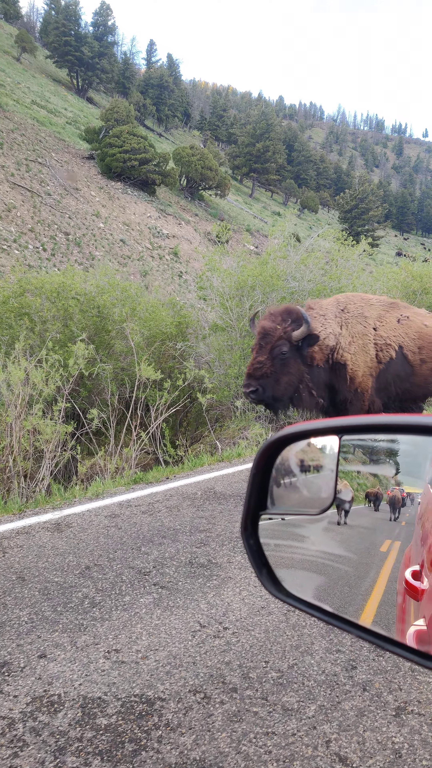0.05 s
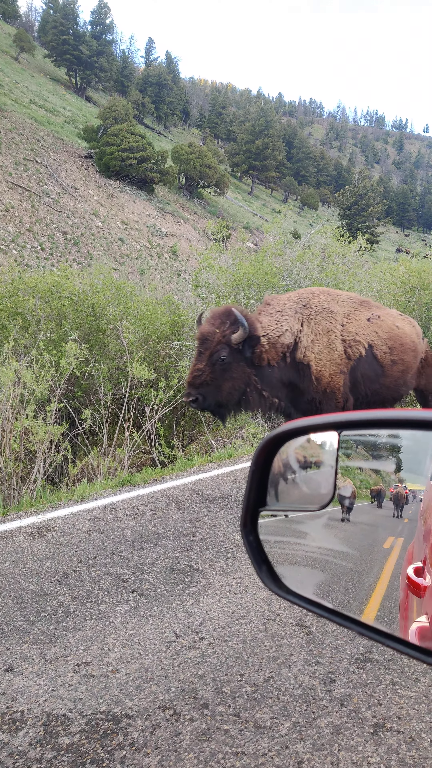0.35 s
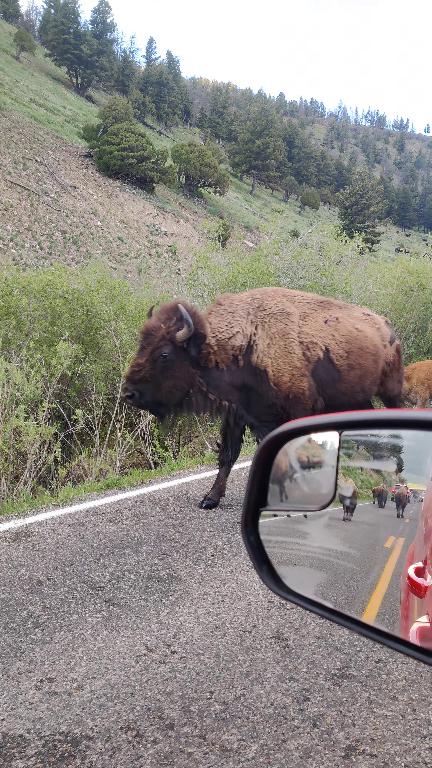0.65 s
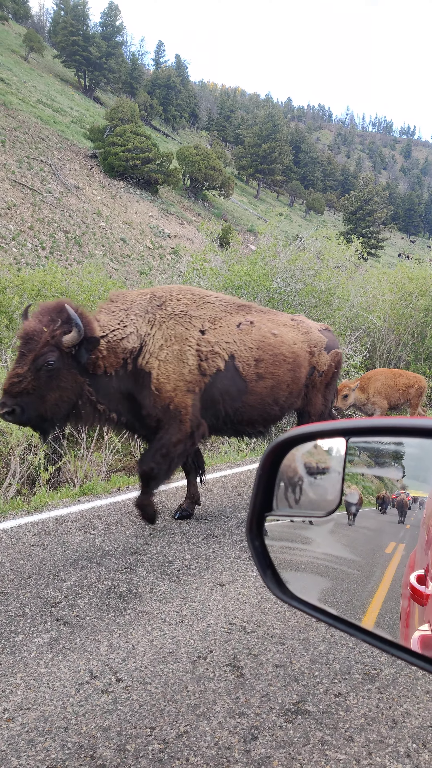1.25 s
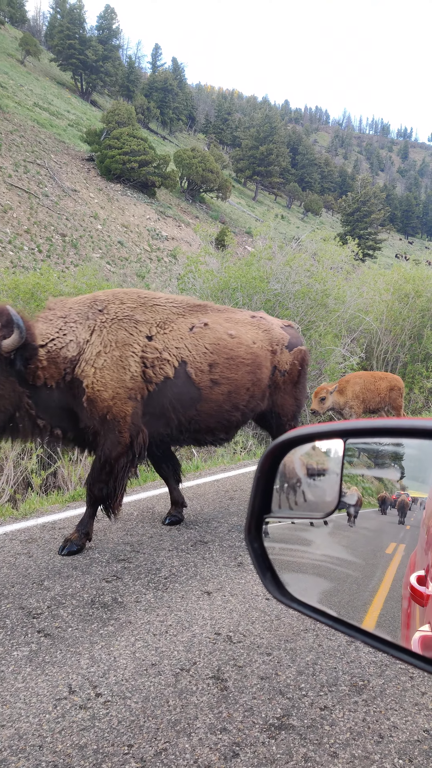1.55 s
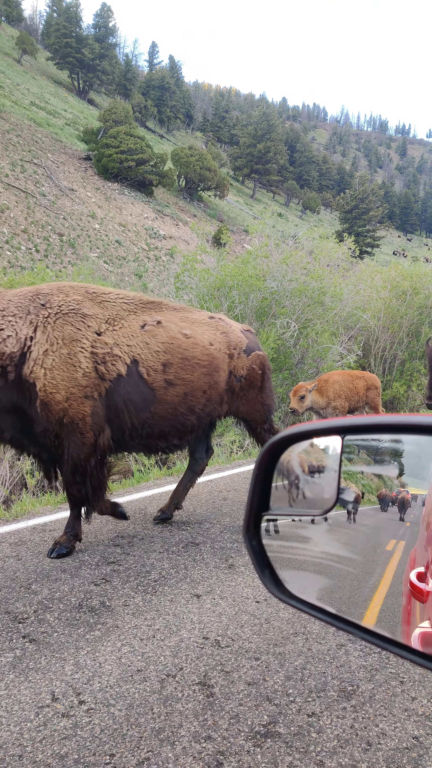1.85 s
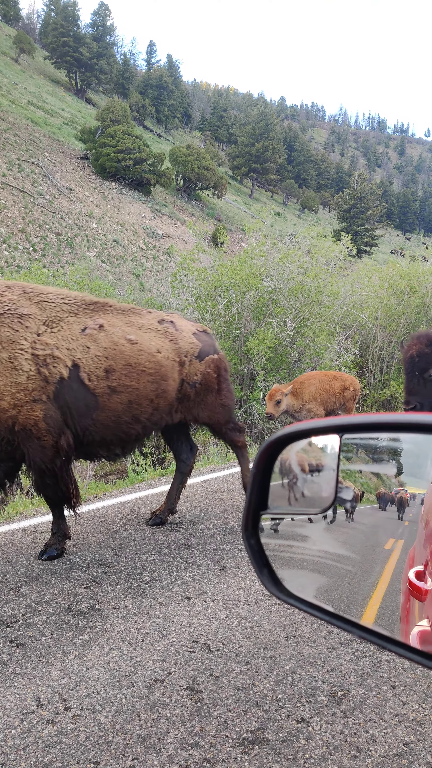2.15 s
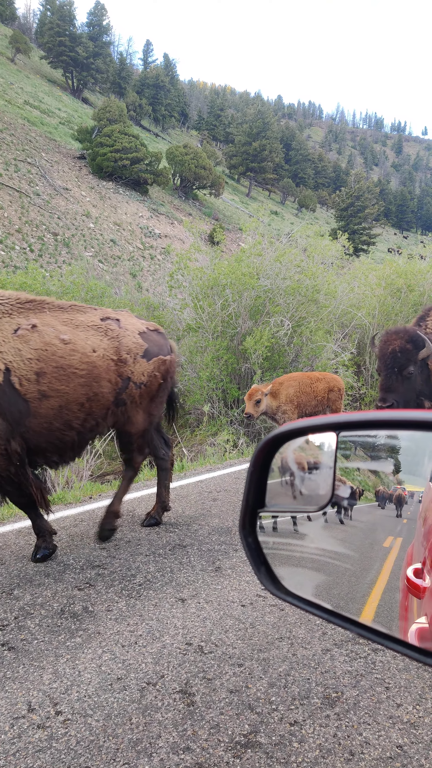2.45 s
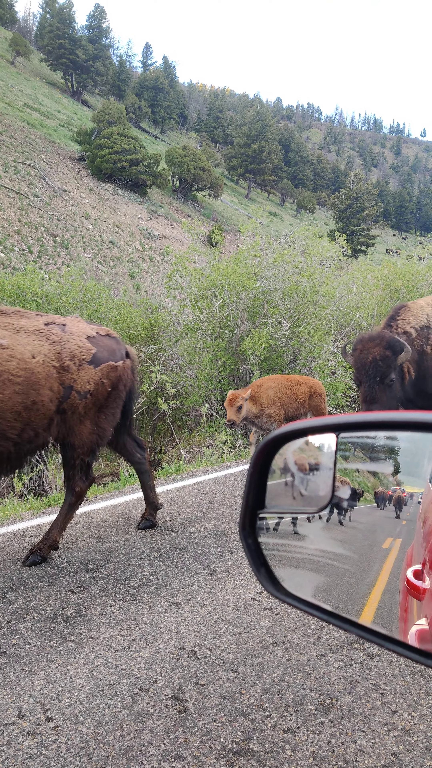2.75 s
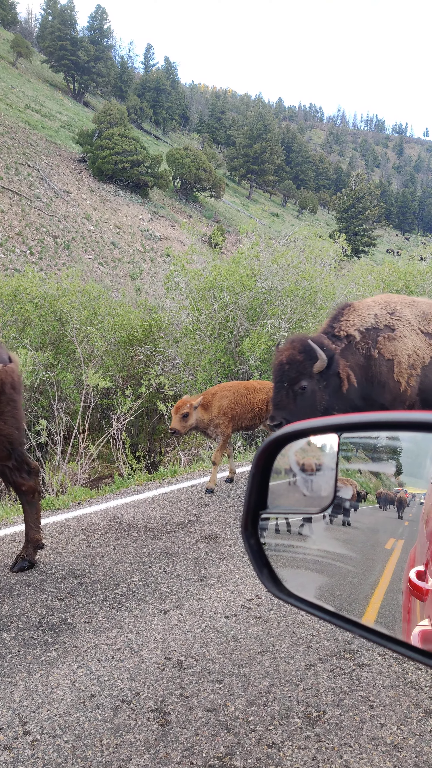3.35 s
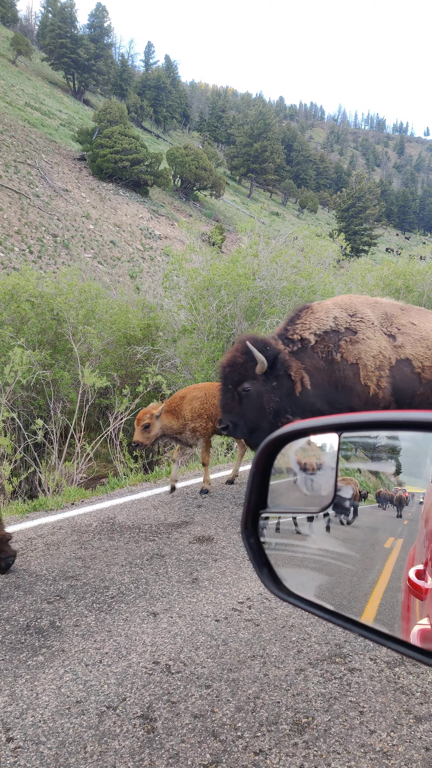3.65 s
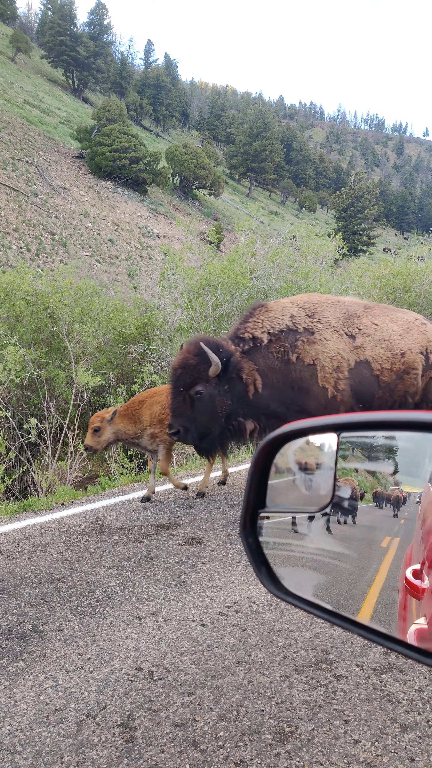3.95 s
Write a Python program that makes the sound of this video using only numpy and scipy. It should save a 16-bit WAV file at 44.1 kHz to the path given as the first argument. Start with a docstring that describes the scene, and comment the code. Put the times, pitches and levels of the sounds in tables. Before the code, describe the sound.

Bison grunt twice and step softly along a road while a car engine idles.

```python
"""Bison passing an idling car

A mountain road, stereo microphones at the car's open window, the herd on the left.
Two grunts, each a slow train of pulses ringing the throat: one open and raspy, one closed and deep.
Hooves clop and scuff grit on the asphalt over the engine's idle and a steady rush of air.
A few soft bumps land right on the right microphone."""
import sys
import numpy as np
from scipy import signal
from scipy.fft import rfft, irfft, next_fast_len
from scipy.io import wavfile
from scipy.ndimage import uniform_filter1d, minimum_filter1d, map_coordinates

SR = 44100
rng = np.random.default_rng(int(sys.argv[2]) if len(sys.argv) > 2 else 0)


def pcm_store(signal):
    """Save signal as 16-bit PCM."""
    levels = np.round(np.clip(np.atleast_2d(signal), -1, 1) * 32767)
    wavfile.write(sys.argv[1], SR, levels.astype(np.int16).T)


N = 176400

# colour of road grit, also of the hiss in a grunt: f/Hz, level/dB
GRIT_COLOUR = [(300, -5), (900, 12.5), (2000, 10), (3200, 4.5), (4900, 2.5), (5800, -8), (8000, -10),
               (11000, -21.5), (16000, -14)]


def open_grunt():
    """An open-mouthed grunt: seven sharp, raspy pulses that slow markedly."""
    # effort: t/s, level/dB, mouth opening (1 = open)
    effort = [(.867, -8.5, 1.07), (.91, 2.5, 0.97), (.957, 2.5, 0.99), (1.003, 0, 0.95), (1.05, -.5, 1),
              (1.10, -1, .99), (1.16, -6.5, 0.98)]
    # throat resonances: f/Hz, level/dB, t60/s
    throat = [(199, -39, 0.043), (395, -36.5, 0.027), (467, -35.5, 0.032), (580, -34.5, 0.051),
              (1510, -46.5, 0.055), (1588, -40.5, 0.077), (1885, -43, 0.055), (2310, -51, 0.07),
              (2600, -53, 0.046), (3020, -43, 0.055), (3470, -45.5, 0.05), (4480, -57, .03),
              (4950, -45, 0.022), (6650, -51, 0.02), (8250, -53, 0.018)]
    return grunt(effort, throat, start_s=.8672, pulses=7, gap_s=.0422, gap_growth_s=.00186,
                 closing_s=.00058, rasp=.35, rasp_s=.0015, hiss_db=-47.5)


def deep_grunt():
    """A closed, deep grunt: fifteen rounder pulses at an almost even pace."""
    # effort: t/s, level/dB, mouth opening (1 = open)
    effort = [(2.75, -8.5, 0.87), (2.785, -2, 0.87), (2.817, 0.5, 0.94), (2.852, -0.5, 0.95),
              (2.92, 3.5, 0.96), (3.02, 2.5, 1.023), (3.06, 1.5, 0.99), (3.092, 0, 1.05), (3.128, 0, 1),
              (3.162, -2.5, 0.6), (3.196, -0.5, 0.85), (3.233, -2.5, 0.96)]
    # throat resonances: f/Hz, level/dB, t60/s
    throat = [(153, -32, 0.068), (340, -28.5, 0.027), (395, -24.5, 0.038), (571, -27.5, 0.051),
              (1620, -55, .045), (1984, -49, 0.052)]
    return grunt(effort, throat, start_s=2.7505, pulses=15, gap_s=.0333, gap_growth_s=.00016,
                 closing_s=.0019, rasp=.12, rasp_s=.0036, hiss_db=-66.5)


def grunt(effort, throat, start_s, pulses, gap_s, gap_growth_s, closing_s, rasp, rasp_s, hiss_db):
    """Flaps of the vocal folds ring the throat; a closing mouth makes them lower, duller and rougher."""
    times, levels, openings = np.transpose(effort)
    out, t = np.zeros(N), np.arange(SR // 10) / SR
    for k in range(pulses):
        s = start_s + gap_s * k + gap_growth_s * k * k / 2
        gain, opening = amp(np.interp(s, times, levels)), np.interp(s, times, openings)
        shut = max(1 - opening, 0)
        shifts = opening + .008 * rng.standard_normal(len(throat))
        tract = np.zeros(len(t))
        for (hz, db, t60), shift in zip(throat, shifts):
            muffle_db = 14 * shut * np.log2(hz / throat[1][0])
            tract += amp(db - muffle_db - 60 * t / t60) * np.sin(2 * np.pi * hz * shift * t)
        tract *= 1 - np.exp(-(t / closing_s) ** 2)
        puff = rng.standard_normal(len(t)) * t * np.exp(-t / rasp_s)
        rough = signal.fftconvolve(puff, tract)[:len(t)]
        rough *= (rasp + 1.2 * shut) * np.linalg.norm(tract) / np.linalg.norm(rough)
        hiss = burst(GRIT_COLOUR, rise_s=.00089, decay_s=.003, tail_db=-20, tail_s=.016, spiky=.48)
        add(out, s - closing_s / 2, gain * (rough - tract))
        add(out, s, gain * amp(hiss_db) * hiss)
    return out


def clops(ring_octaves=.11):
    """Hooves strike asphalt: each a ringing knock of horn, a dull thud and a gritty crack."""
    # steps: t/s, level/dB, ring f/Hz, relative thud/dB, relative crack/dB, ring boost/dB
    steps = [(0.265, -48, 1460, -20, 11, -2), (0.7395, -33, 1450, -6, -10, 4), (1.114, -41, 1830, 1, 2, 12),
             (1.288, -42, 1490, -10, -20, 10), (1.5441, -32.5, 1640, -13, -9, 3),
             (1.868, -42, 1700, -4, -18, 0), (1.901, -39, 1490, -6, -11, -1),
             (2.0097, -34.5, 1640, -23, -30, 12), (2.320, -39.5, 1200, 3, -3, 0),
             (2.4661, -31, 1870, -14, -11, -2), (3.044, -36.5, 1800, -20, -15, -3),
             (3.089, -32.5, 1470, 1, -6.5, -10), (3.274, -37, 1080, 9.5, -22, 0),
             (3.362, -41.5, 1600, -13, -1.5, -7), (3.421, -39.5, 1600, -1, -1, -3.5),
             (3.727, -40, 1440, 2, -23, -1), (3.8445, -26, 1600, -2.5, -12, -1),
             (3.863, -34.5, 1100, 0, -12, 0)]
    # colour of horn: multiple of the ring frequency, level/dB
    horn_colour = [(.2, -16), (.5, -2), (.8, -3), (1, 4.5), (1.15, -2), (1.35, -21), (3, -21), (3.7, -57),
                   (9, -59)]
    # colour of the thud: f/Hz, level/dB
    thud_colour = [(100, 15), (300, 0), (650, 5), (1200, -11), (3000, -67)]
    out = np.zeros(N)
    for s, db, ring_hz, thud_db, crack_db, ring_db in steps:
        horn = [(ring_hz * k, level + ring_db * np.exp(-(np.log2(k) / ring_octaves) ** 2))
                for k, level in horn_colour]
        knock = burst(horn, rise_s=.00021, decay_s=.00095, tail_db=-14, tail_s=.01, spiky=.06)
        thud = burst(thud_colour, rise_s=.00029, decay_s=.0043, tail_db=-26, tail_s=.016, spiky=.12)
        crack = burst(GRIT_COLOUR, rise_s=.00051, decay_s=.00089, tail_db=-16, tail_s=.011, spiky=.13)
        add(out, s, amp(db) * (knock + amp(thud_db) * thud + amp(crack_db) * crack))
    return out


def scuffs():
    """Grit crunches under the hooves."""
    # crunches: t/s, level/dB, length/s, treble tilt/(dB per octave)
    crunches = [(.272, -42.5, 0.0076, 1.5), (.345, -49.5, .11, -1), (.47, -47, 0.026, 0),
                (0.759, -37, 0.011, 1.5), (0.772, -42.5, 0.032, 3), (1.079, -45, 0.0097, 4.5),
                (1.442, -51.5, 0.015, 8), (1.752, -49.5, 0.032, 6.5), (1.779, -46.5, 0.019, 3.5),
                (1.9327, -36.5, 0.011, 0.3), (2.182, -47.5, 0.0086, 6), (2.409, -43.5, 0.0063, 8),
                (2.447, -48.5, 0.038, 1), (2.822, -38, 0.0077, 2), (2.837, -43, 0.0078, 8.5),
                (2.854, -46, 0.013, 3), (2.900, -47, 0.0042, 8), (3.164, -51, 0.059, 6.5),
                (3.273, -37.5, 0.0091, 1.5), (3.496, -50, 0.033, 9.5)]
    out = np.zeros(N)
    for s, db, length, tilt in crunches:
        colour = [(hz, level + tilt * np.log2(hz)) for hz, level in GRIT_COLOUR]
        crunch = burst(colour, rise_s=.13 * length, decay_s=.41 * length,
                       tail_db=-36, tail_s=.026, spiky=.4)
        add(out, s - .099 * length, amp(db) * crunch)
    return out


def stones(level_db=-58, count=60):
    """Small stones tick at random as they shift under the rest of the herd."""
    out = np.zeros(N)
    for when, size in rng.random((count, 2)):
        tick = burst(GRIT_COLOUR, rise_s=.0011, decay_s=.0038, tail_db=-21, tail_s=.0067, spiky=.7)
        add(out, when * N / SR, amp(level_db + 10 * size ** 2) * tick)
    return out


def swell():
    """A soft, dull rush grows and fades around the last step."""
    # rise and fall: t/s, level/dB
    levels = [(3.68, -83), (3.77, -45), (3.84, -50), (3.88, -51.5), (3.98, -68)]
    # colour of the rush: f/Hz, level/dB
    colour = [(200, -25), (420, 5), (600, 1), (850, -11), (1300, -13), (4000, -52)]
    rush = filtered(rng.standard_normal(N), lambda hz: amp(along(colour, hz)))
    return amp(curves(levels)[0]) * rush / np.sqrt(np.mean(rush ** 2))


def engine(firing_hz=26, drift_rad=.2, right_lag_rad=1.0):
    """The idle under the microphones: a strong firing fundamental and slightly unsteady orders."""
    # firing fundamental: t/s, left level/dB, right level/dB
    boom_levels = [(0, -25, -30), (.5, -31, -25.5), (1.3, -25, -32), (1.9, -37.5, -26.5), (2.5, -31, -24.5),
                   (3.0, -31, -23.5), (3.5, -32.5, -21), (4, -23.5, -23.5)]
    # engine orders: multiple of the firing rate (rounded below to quarters), level/dB
    order_levels = [(.75, -59), (2, -36.5), (3, -46.5), (5, -58.5), (6, -53.5), (7, -57), (7.5, -58.5),
                    (9.5, -60.5), (14.6, -66)]
    # hum at four times the firing rate: t/s, level/dB
    hum_levels = [(0, -44), (.5, -41.5), (1.2, -40.5), (1.4, -48), (2.6, -43.5), (4, -48.5)]
    phase = 2 * np.pi * firing_hz * np.arange(N) / SR
    boom = amp(curves(boom_levels) - 2 * wobble(5.3)) * np.sin([phase, phase - right_lag_rad])
    orders = np.zeros(N)
    for multiple, db in order_levels:
        gain = amp(db + 1.1 * wobble(5))
        offset = 2 * np.pi * rng.random() + drift_rad * wobble(4)
        orders += gain * np.sin(round(multiple * 4) / 4 * phase + offset)
    hum = amp(curves(hum_levels)[0]) * np.sin(4 * phase + drift_rad * wobble(4))
    return np.sqrt(2) * (boom + orders + hum)


def bumps(left_leak_db=-32, build_s=.0014):
    """Dull pops on the right microphone: pressure builds, then lets go."""
    # pops: t/s, level/dB, low-pass f/Hz
    pops = [(0.9, -20, 700), (1.179, -12, 50.5), (1.275, -24, 109), (1.6835, -9, 1000), (1.6879, -4, 2590),
            (1.704, -17.5, 90), (2.5853, 2.5, 1700)]
    # colour of a pop before the low-pass: f/Hz, level/dB
    colour = [(20, -14.5), (45, -3), (80, 5), (120, 2.5), (240, -2), (340, 0), (680, -6.5), (1300, -12.5),
              (2400, -11), (3300, -26), (5000, -42)]
    out, t = np.zeros(N), np.arange(SR // 100) / SR
    push = np.convolve(np.exp(-t / build_s)[::-1], ring(colour))
    for s, db, cutoff_hz in pops:
        pop = signal.lfilter(*signal.butter(2, cutoff_hz, fs=SR), push)
        add(out, s - t[-1], -amp(db) * pop / np.abs(pop).max())
    return np.array([amp(left_leak_db) * out, out])


def thrum(centre_s=1, half_length_s=.03, hz=80, glide_hz_per_s=-60):
    """A brief, slightly falling low tone, mostly on the right."""
    t = np.arange(N) / SR - centre_s
    tone = np.sin(2 * np.pi * (hz + glide_hz_per_s * t / 2) * t)
    return amp([[-41.5], [-25.5]]) * np.exp(-(t / half_length_s) ** 2) * tone


def roadside(x):
    """A short, thin stereo echo from car, road and bushes."""
    # echo decay: f/Hz, t60/s
    decay = [(200, 0.32), (2000, 0.21), (10000, 0.075)]
    hz, t, spectra = signal.stft(rng.standard_normal((2, SR // 3)), SR, nperseg=256)
    tail = signal.istft(spectra * amp(-60 * t / along(decay, hz)[:, None]), SR, nperseg=256)[1]
    return signal.fftconvolve(x[None], tail / np.linalg.norm(tail[0]), axes=1)[:, :N]


def air(flutter_db=.83):
    """Steady rush of the car and the valley beyond, alike on both microphones in the upper bass."""
    # noise density: f/Hz, left level/dB, right level/dB
    density = [(15, -51, -67), (68.5, -55.5, -60), (98.5, -59, -60.5), (132, -69, -70), (185, -64, -69.5),
               (249, -70.5, -70), (336, -76, -80.5), (440, -74.5, -80.5), (606, -74.5, -77.5),
               (666, -81, -84), (1030, -83.5, -86.5), (1860, -86, -91.5), (2720, -91.5, -101),
               (5050, -95.5, -106), (5350, -103, -110), (8900, -104, -116), (13400, -103, -107),
               (15800, -100, -109)]
    # likeness of left and right: f/Hz, correlation
    likeness = [(40, 0), (130, 1), (290, 0.82), (640, 0.73), (1400, 0.12), (3100, 0), (6800, 0)]
    # slow rise and fall: t/s, level/dB
    levels = [(0, 0), (.4, -0.5), (1.0, -0.5), (1.5, -2), (2.2, -1.5), (2.7, -1.5), (3.3, 0.5),
              (3.65, -2.5), (3.83, -0.5), (4, 0)]

    def mid_side_gains(hz):
        angle = np.arccos(along(likeness, hz)) / 2
        return np.array([np.cos(angle), np.sin(angle)])

    mid, side = filtered(rng.standard_normal((2, N)), mid_side_gains)
    colours = [np.array(density)[:, [0, channel]] for channel in (1, 2)]
    pair = filtered(np.array([mid + side, mid - side]), lambda hz: amp([along(c, hz) for c in colours]))
    return np.sqrt(SR / 2) * pair * amp(curves(levels)[0] + flutter_db * wobble(14))


def burst(colour, rise_s, decay_s, tail_db, tail_s, spiky):
    """A crack of grainy noise with a weaker tail; spiky sets how uneven the grains are."""
    t = np.arange(SR // 6) / SR
    noise = rng.standard_normal(len(t))
    grains = np.repeat(rng.standard_normal(len(t)), 16)[:len(t)].clip(-2, 2)
    shape = (1 - np.exp(-t / rise_s)) * (np.exp(-t / decay_s) + amp(tail_db) * np.exp(-t / tail_s))
    sound = signal.fftconvolve(noise * np.exp(spiky * grains) * shape, ring(colour))
    return sound / np.linalg.norm(sound) * np.linalg.norm(shape) / shape.max()


def ring(colour, size=4096):
    """Minimum-phase impulse response of energy 1 with the given colour."""
    cepstrum = irfft(np.log(amp(along(colour, np.fft.rfftfreq(size, 1 / SR)))))
    cepstrum[1:size // 2] *= 2
    cepstrum[size // 2 + 1:] = 0
    impulse = irfft(np.exp(rfft(cepstrum)))
    return impulse / np.linalg.norm(impulse)


def amp(db):
    """Gain of a level in dB."""
    return 10 ** (np.asarray(db) / 20)


def along(points, hz):
    """Rows of f/Hz, value, read on a log frequency axis."""
    freqs, values = np.transpose(points)
    return np.interp(np.log(hz + 1), np.log(freqs + 1), values)


def curves(rows):
    """One value per sample for each column after the time."""
    times, *columns = np.transpose(rows)
    return np.array([np.interp(np.arange(N) / SR, times, c) for c in columns])


def wobble(rate):
    """A smooth random curve, rate knots a second."""
    return map_coordinates(rng.standard_normal(int(N * rate / SR) + 4), [np.arange(N) * rate / SR])


def filtered(x, response):
    """x through a gain given as a function of frequency."""
    size = next_fast_len(N + SR // 2)
    return irfft(rfft(x, size) * response(np.fft.rfftfreq(size, 1 / SR)), size)[..., :N]


def add(track, s, sound):
    """Mix a sound into a track at time s."""
    part = track[round(s * SR):][:len(sound)]
    part += sound[:len(part)]


def scene(echo_db=-16.5):
    """At the window the left microphone faces the herd; the right one is shaded from it."""
    # shading of the right microphone: f/Hz, level/dB
    shade = [(100, 1), (500, -4), (1200, -13), (1900, -8), (2600, -16), (5000, -31), (15000, -17)]
    herd = open_grunt() + deep_grunt() + clops() + scuffs() + stones() + swell()
    left, right = herd + amp(echo_db) * roadside(herd)
    right = filtered(right, lambda hz: amp(along(shade, hz)))
    return np.array([left, right]) + engine() + air() + bumps() + thrum()


def record(dry, ceiling=.88, hold_s=.068, top_hz=15850):
    """Each channel has a limiter that holds and recovers after a peak; then the band limit."""
    size = int(hold_s * SR)
    needed = np.minimum(1, ceiling / (np.abs(dry) + 1e-9))
    held = minimum_filter1d(needed, size, axis=1, origin=(size - 1) // 2)
    gain = np.minimum(held, uniform_filter1d(held, size, axis=1, origin=(size - 1) // 2))
    return filtered(dry * gain, lambda hz: hz < top_hz)


dry = scene()
out = record(dry)
pcm_store(out)
```